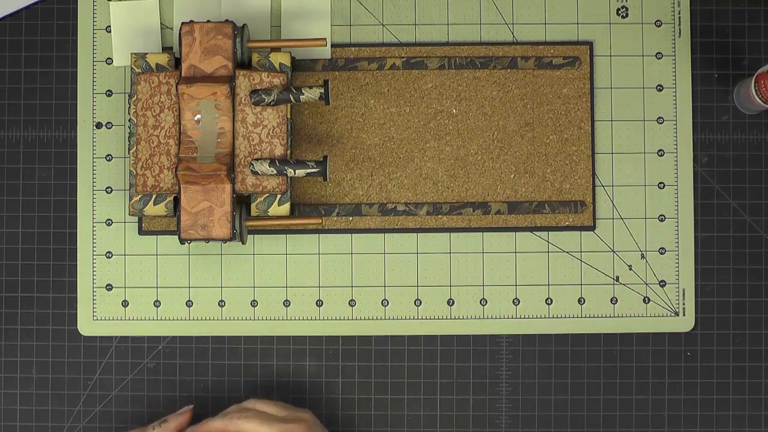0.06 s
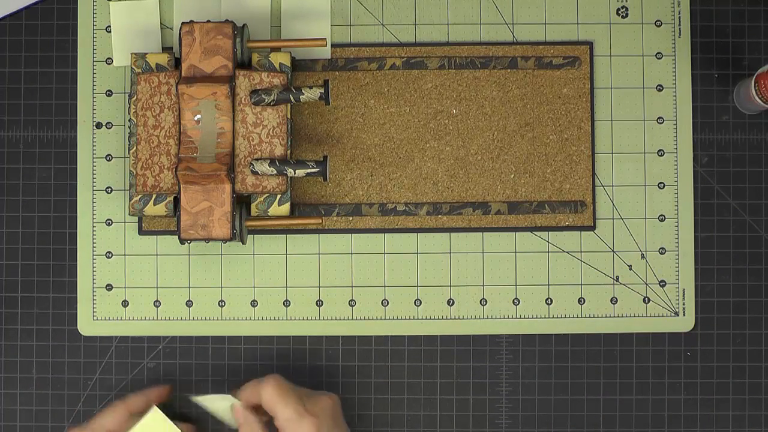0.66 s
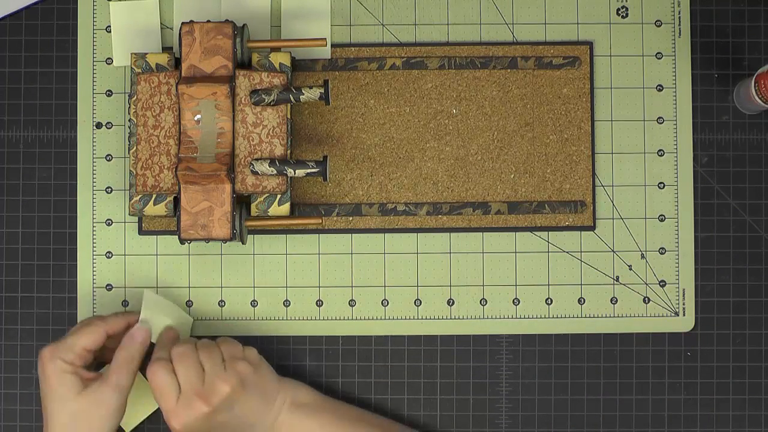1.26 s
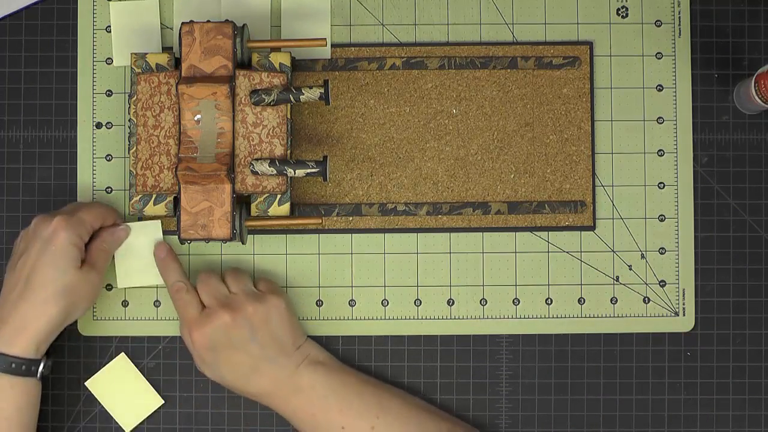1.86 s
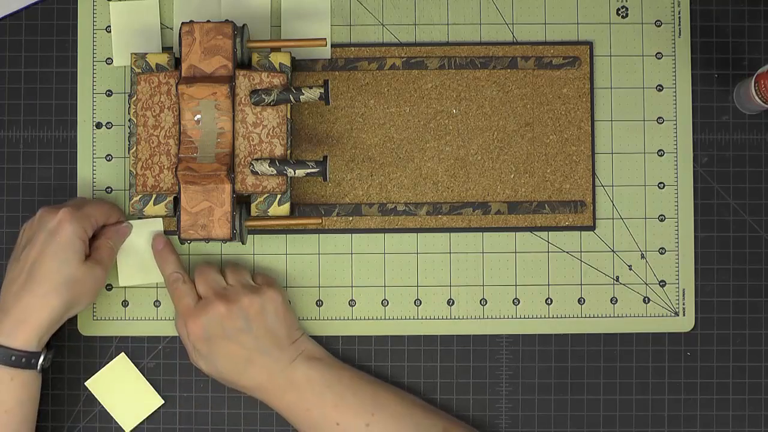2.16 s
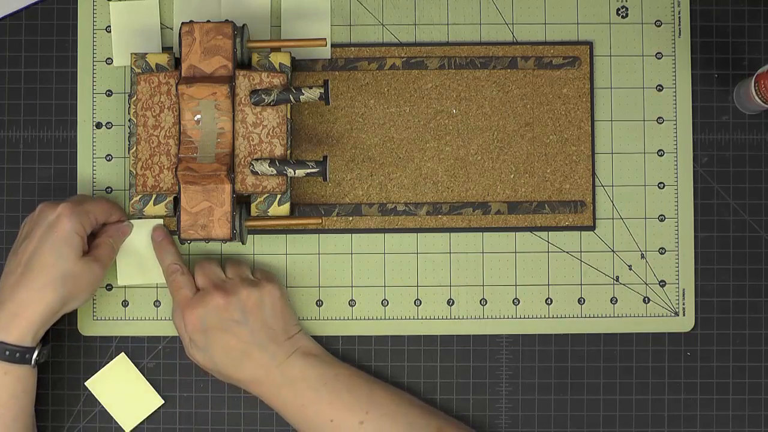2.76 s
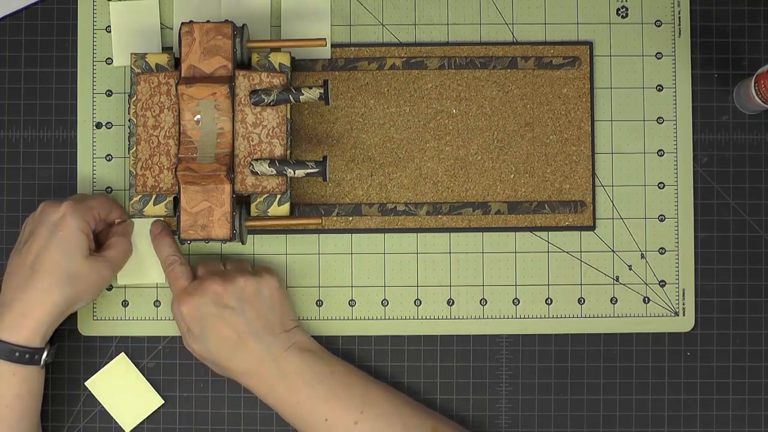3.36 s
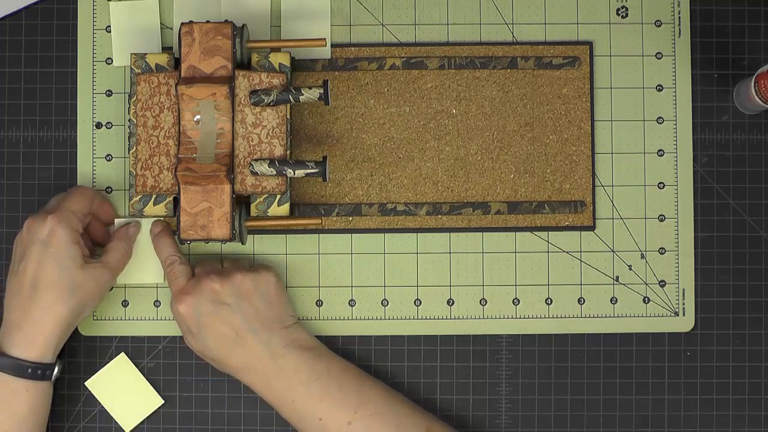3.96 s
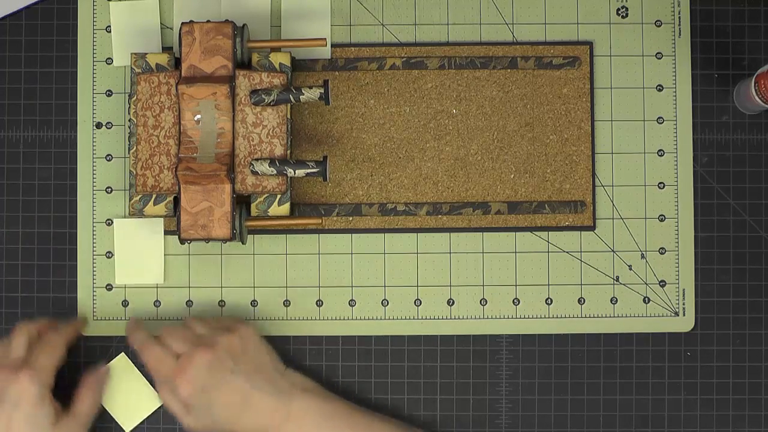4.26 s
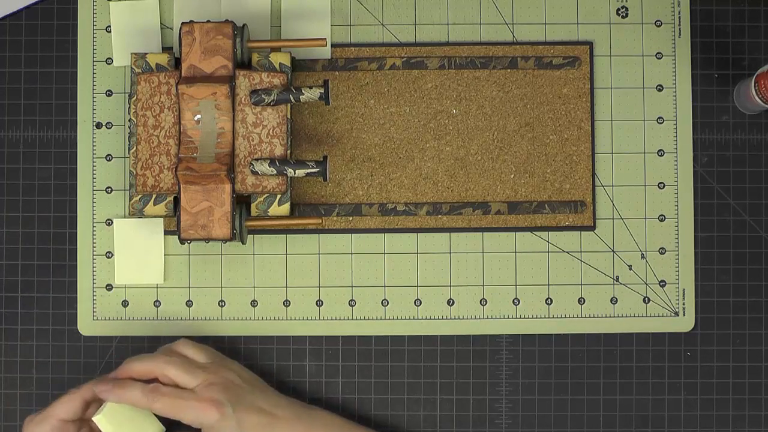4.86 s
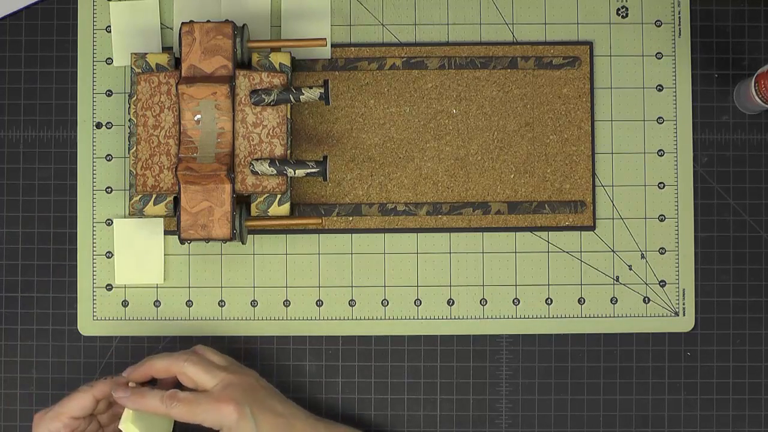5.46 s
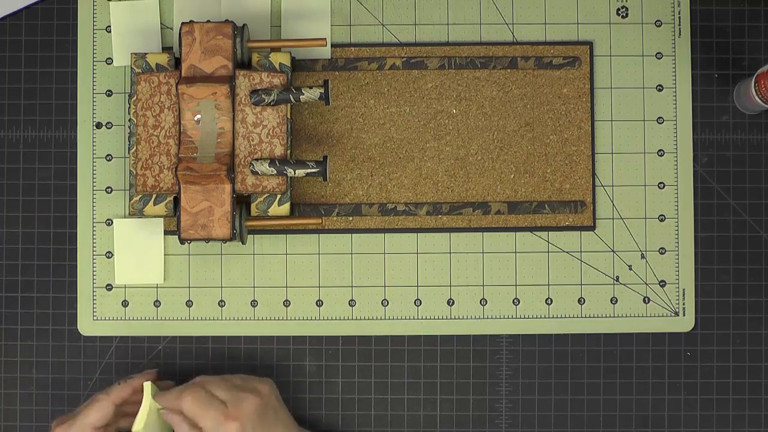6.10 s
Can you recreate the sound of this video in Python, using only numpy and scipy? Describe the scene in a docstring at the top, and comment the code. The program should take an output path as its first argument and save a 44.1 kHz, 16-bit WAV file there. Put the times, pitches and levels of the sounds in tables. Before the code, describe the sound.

Close paper rustles, flicks and snaps as sticky notes are peeled and pressed down, with soft desk knocks over a steady ventilation rumble.

```python
"""Sticky notes, peeled off a pad, flexed, slid under the edge of a model and pressed on a cutting mat.
Corners flick free and the bent sheet buckles with a snap; friction makes the paper hiss and ring.
Pad and fingers knock and drag on the desk. A nearly mono microphone above the desk picks up
the paper, the short echoes of a small room and a steady ventilation rumble."""
import sys
import numpy as np
from scipy import signal
from scipy.fft import rfft, irfft, next_fast_len
from scipy.io import wavfile
from scipy.ndimage import map_coordinates

SR = 44100
rng = np.random.default_rng(int(sys.argv[2]) if len(sys.argv) > 2 else 0)


def wrap_up_sound(samples):
    """Save the sound to the file named by the first command line argument, as 16-bit audio."""
    columns = np.atleast_2d(samples).T
    # keep every value between -1 and 1, then stretch to whole-number steps
    tamed = np.clip(columns, -1, 1)
    steps = np.round(tamed * 32767).astype(np.int16)
    wavfile.write(sys.argv[1], SR, steps)


N = 270333
LEAD_S = 0.025  # run-up to the peak of a slip


def amp(db):
    """Decibels to gain."""
    return 10 ** (np.asarray(db) / 20)


def unit(x):
    """x at rms 1."""
    return x / np.sqrt(np.mean(x ** 2) + 1e-20)


def burst(x, db):
    """Scale a short sound to the energy of 4 ms at the given level."""
    return amp(db) * x / np.sqrt(np.sum(x ** 2) / (0.004 * SR))


def along(points, hz):
    """Read (f/Hz, value) points on a log frequency axis."""
    f, values = np.transpose(points)
    return np.interp(np.log(hz + 1), np.log(f + 1), values)


def filtered(x, response):
    """Filter x by a complex response of frequency."""
    n = x.shape[-1]
    padded = next_fast_len(n + 4096)
    return irfft(rfft(x, padded) * response(np.fft.rfftfreq(padded, 1 / SR)), padded)[..., :n]


def band(hz, low_hz, top_hz):
    """A causal band-pass, 12 dB an octave on each side."""
    low, top = 1j * hz / low_hz, 1j * hz / top_hz
    return low ** 2 / (1 + np.sqrt(2) * low + low ** 2) / (1 + np.sqrt(2) * top + top ** 2)


def peak(hz, centre_hz, width_hz):
    """A resonance applied twice, for steep sides."""
    return (1j * hz * width_hz / (centre_hz ** 2 - hz ** 2 + 1j * hz * width_hz)) ** 2


def add(track, s, x):
    """Mix x into the track from time s."""
    skip, start = max(0, -round(s * SR)), max(0, round(s * SR))
    x = x[..., skip:skip + max(0, N - start)]
    track[..., start:start + x.shape[-1]] += x


def wobble(n, rate):
    """A smooth random curve, rate knots a second."""
    knots = rng.standard_normal(int(n * rate / SR) + 4)
    return map_coordinates(knots, [np.arange(n) * rate / SR])


def swell(n, edge):
    """A stroke speeds up and slows; edge is the length of each ramp as a share of the stroke."""
    u = np.linspace(0, 1, n)
    ramp = np.clip(np.minimum(u, 1 - u) / edge, 0, 1)
    return np.sin(np.pi / 2 * ramp) ** 0.59


# Width of the room sound at the microphone: f/Hz, side level/dB
SIDE_LEVELS = [(60, -19.5), (130, -13.5), (300, -7), (1000, -11.5), (4000, -34.5), (12000, -35.5)]
def diffuse(pair):
    """Two unrelated signals become the mid and side of a narrow stereo field."""
    side = filtered(pair[1], lambda hz: amp(along(SIDE_LEVELS, hz)))
    return np.array([pair[0] + side, pair[0] - side])


# Reverberation of the small room: f/Hz, time to fall 60 dB/s
ROOM_DECAY = [(150, 0.44), (1000, 0.31), (4000, 0.25), (8000, 0.2), (15000, 0.062)]
# Early echoes from surfaces near the desk: delay/s, gain
EARLY_ECHOES = [(.0027, 0.31), (.0048, 0.095), (.0085, 0.086), (0.0116, 0.23)]
def in_room(x, wet_db, build_s=0.00083, pan=0.11):
    """Desk to microphone: direct sound, early echoes and a tail that differs from spot to spot."""
    hz, t, spectra = signal.stft(rng.standard_normal((2, SR // 3)), SR, nperseg=256)
    decay = amp(-60 * t / along(ROOM_DECAY, hz)[:, None])
    tail = signal.istft(spectra * decay, SR, nperseg=256)[1]
    onset = 1 - np.exp(-np.arange(tail.shape[1]) / SR / build_s)
    tail = diffuse(tail * onset)
    response = amp(wet_db) * tail / np.linalg.norm(tail[0])
    response[:, 0] += 1  # direct sound
    for delay, gain in EARLY_ECHOES:
        arrival = round(delay * rng.uniform(0.85, 1.15) * SR)
        response[:, arrival] += gain * (1 + pan * rng.permutation([-1, 1]))
    return signal.fftconvolve(x[None], response, axes=1)


# Room tone at the microphone: f/Hz, relative spectral level/dB
ROOM_TONE = [(20, -26), (32, -13), (42, -5.5), (54, 4), (85, -3), (170, -5.5), (320, -9), (760, -14),
             (1400, -25), (2100, -27), (3900, -25.5), (7000, -31), (12400, -25.5), (16000, -29.5)]
# Fan and mains hum: f/Hz, level/dB
HUM_TONES = [(74, -60), (120, -65.5)]
def ventilation(air_db=-51.5, duct_db=-62, duct_top_hz=1700):
    """Steady rumble and hiss, a rush of air with a steep upper edge, and a hum that wavers."""
    def room_noise(response):
        return unit(diffuse(filtered(rng.standard_normal((2, N)), response)))
    air = room_noise(lambda hz: amp(along(ROOM_TONE, hz)))
    duct = room_noise(lambda hz: band(hz, 680, 3300) / (1 + (hz / duct_top_hz) ** 16))
    hum, t = np.zeros(N), np.arange(N) / SR
    for hz, db in HUM_TONES:
        waver = amp(2.5 * wobble(N, rate=4.6))
        phase = 2 * np.pi * hz * t + 1.1 * wobble(N, rate=6.2)
        hum += amp(db) * unit(waver * np.sin(phase))
    return amp(air_db) * air + amp(duct_db) * duct + hum


# Pad and fingers land on the desk and settle: t/s, level/dB, loss per contact/dB, f/Hz
DESK_KNOCKS = [(0.613, -42, 24, 248), (0.9972, -28.5, 3, 660), (1.109, -38.5, 21, 1320),
               (4.027, -46, 4, 326), (4.3671, -36.5, 1.5, 326), (5.8393, -44.5, 12, 920)]
def knocks(contacts=4, fall_s=0.0095, first_gap_s=0.008, gap_growth=1.3, dulling=0.91, spread=1.84):
    """Soft contacts thud in the covered desk, each later, weaker and duller than the last."""
    out, t = np.zeros((2, N)), np.arange(SR // 12) / SR
    for s, db, loss_db, pitch_hz in DESK_KNOCKS:
        for k in range(contacts):
            centre_hz = pitch_hz * dulling ** k
            low_hz, top_hz = centre_hz / spread, centre_hz * spread
            contact = np.exp(-t / fall_s) * rng.standard_normal(len(t))
            soft = signal.sosfilt(signal.butter(2, top_hz, fs=SR, output="sos"), contact)
            thud = filtered(soft, lambda hz: band(hz, low_hz, top_hz))
            delay = first_gap_s * sum(gap_growth ** np.arange(k))
            add(out, s + delay, in_room(burst(thud, db - loss_db * k), wet_db=-7))
    return out


def fibres(n, rate, spread_db=3.5):
    """Countless tiny slips of fibres, bunched into grains."""
    return unit(rng.standard_normal(n) * amp(spread_db * wobble(n, rate)))


def friction(n):
    """Grainy sliding force under a finger whose pressure wavers."""
    return fibres(n, rate=390) * amp(0.57 * wobble(n, rate=34))


def slip(rise_s, fall_s):
    """Tension builds in a rush of tiny slips, then lets go at LEAD_S."""
    t = np.arange(SR // 12) / SR - LEAD_S
    return np.exp(np.minimum(t / rise_s, -t / fall_s)) * rng.standard_normal(len(t))


# Tone colour of the paper from overhead: f/Hz, level/dB
PAPER_COLOUR = [(100, 15), (400, 1.5), (1250, 3.5), (1900, 1), (2600, 2), (3700, 7.5), (4800, 5),
                (6300, 4.5), (8200, 0.5), (12000, 4), (16000, 0.5)]
# Bending modes of a loose note: multiple of its ring pitch, weight
BENDING_MODES = [(0.961, 0.62), (1.048, 0.073), (1.54, 0.04)]
def sheet(x, ring_hz, ring_db, low_hz, top_hz, q=11, body_db=-18, smear_s=0.000664):
    """A loose note: a broad band, modes set by its free length, and a little body from the desk."""
    def mode(r):  # radiates its acceleration, which leaves a valley just below it
        return -r ** 2 / q / (1 - r ** 2 + 1j * r / q)

    def response(hz):
        ring = sum(weight * mode(hz / (ratio * ring_hz)) for ratio, weight in BENDING_MODES)
        paper = band(hz, low_hz, top_hz) * (1 + (amp(ring_db) - 1) * ring)
        body = amp(body_db) * band(hz, 80, 1700)
        # bending waves carry the highs across the sheet faster than the lows
        dispersion = np.exp(-2j * np.pi * smear_s * (2 * np.sqrt(hz * ring_hz) - hz))
        return amp(along(PAPER_COLOUR, hz)) * dispersion * (paper - body)
    return filtered(x, response)


# The hand drags paper over the desk: start t/s, end t/s, level/dB
DESK_DRAGS = [(0.411, 0.495, -50), (4.401, 4.433, -45.5), (4.513, 4.579, -39), (5.926, 6.06, -53.5)]
def drags(hiss_db=-4):
    """Friction on the desk top sounds lower than the paper, which hisses along with it."""
    out = np.zeros((2, N))
    for start, end, db in DESK_DRAGS:
        n = round((end - start) * SR)
        rub = unit(filtered(fibres(n, rate=700), lambda hz: band(hz, 360, 1170)))
        paper = sheet(friction(n), ring_hz=4020, ring_db=3, low_hz=1570, top_hz=6200)
        hiss = amp(hiss_db) * unit(paper * np.linspace(1, 0.35, n))
        add(out, start, in_room(amp(db) * swell(n, edge=1) * (rub + hiss), wet_db=-9.5))
    return out


# The sheet's edge chatters over the desk: t/s, length/s, level/dB, slip rate/Hz, top f/Hz
EDGE_SCRAPES = [(0.42, 0.077, -45, 2340, 3120), (1.319, 0.079, -41.5, 1860, 6500)]
def scrapes(regularity=0.62):
    """The edge sticks and slips almost regularly, so hiss gathers at multiples of the slip rate."""
    out = np.zeros((2, N))
    for start, length, db, slip_hz, top_hz in EDGE_SCRAPES:
        def comb(hz):
            return band(hz, 1340, top_hz) / (1 - regularity * np.exp(-2j * np.pi * hz / slip_hz))
        n = round(length * SR)
        chatter = unit(filtered(friction(n), comb))
        add(out, start, in_room(amp(db) * swell(n, edge=0.71) * chatter, wet_db=-15))
    return out


# Modes of a note pinned to the mat by a finger: f/Hz, width/Hz, level/dB
PINNED_MODES = [(3866, 1190, 4.5), (5390, 2300, -3), (7270, 1600, -21)]
def pinned(x, top_hz, hiss_db=-11):
    """The pinned note: a few damped modes over a broad hiss."""
    def response(hz):
        modes = sum(amp(db) * peak(hz, f, width) for f, width, db in PINNED_MODES)
        return modes + amp(hiss_db) * band(hz, 610, top_hz)
    return filtered(x, response)


# A finger pushes the note along the mat: t/s, length/s, level/dB
FINGER_PUSHES = [(2.008, 0.036, -52), (2.601, 0.059, -64), (2.874, 0.064, -61.5), (3.153, 0.033, -53),
                 (3.269, 0.13, -59.5), (3.423, .125, -44), (3.634, 0.037, -41), (3.803, 0.073, -47.5),
                 (3.952, .07, -53.5), (4.004, 0.062, -43)]
def rubs():
    """The friction of each push swells and fades, ringing the pinned note."""
    out = np.zeros((2, N))
    for start, length, db in FINGER_PUSHES:
        n = round(length * SR)
        rub = unit(pinned(friction(n), top_hz=11200))
        add(out, start, in_room(amp(db) * swell(n, edge=0.59) * rub, wet_db=-6))
    return out


# Clicks of the note on the mat: t/s, level/dB, fall/s
EDGE_CATCHES = [(1.7508, -43, 0.001), (3.1732, -49, 0.0047), (3.361, -55, .0015), (3.643, -26, 0.0014),
                (3.6772, -26, 0.003), (4.027, -33, 0.0013), (4.037, -34, 0.0084), (4.1307, -41, 0.0057)]
def catches(rise_s=0.0024):
    """The pinned note's edge catches and slips free, always at the same pitch."""
    out = np.zeros((2, N))
    for s, db, fall_s in EDGE_CATCHES:
        click = pinned(slip(rise_s, fall_s), top_hz=11600)
        add(out, s - LEAD_S, in_room(burst(click, db), wet_db=-9.5))
    return out


def crinkles(start_s=5.15, end_s=9.6, first_db=-53, last_db=-45, count=12):
    """Fingertips work the next note loose in tiny random ticks; only those before sample N sound."""
    out = np.zeros((2, N))
    for progress, weakness in rng.random((count, 2)):
        s = start_s + (end_s - start_s) * progress
        db = first_db + (last_db - first_db) * progress - 6 * weakness
        tick = sheet(slip(0.0006, 0.00066), ring_hz=4050, ring_db=26, low_hz=1800, top_hz=9000)
        add(out, s - LEAD_S, in_room(burst(tick, db), wet_db=-8))
    return out


def slide(curve, ring_hz, ring_db, low_hz, dull_hz, bright_hz, turn_db=-49.5, range_db=9):
    """Friction drives the loose sheet: the faster it moves, the louder and brighter."""
    times, levels = np.transpose(curve)
    n = round((times[-1] - times[0]) * SR)
    level_db = np.interp(times[0] + np.arange(n) / SR, times, levels)
    brightness = (1 + np.tanh((level_db - turn_db) / range_db)) / 2
    dull = unit(sheet(friction(n), ring_hz, ring_db, low_hz, dull_hz, q=10))
    bright = unit(sheet(friction(n), ring_hz, ring_db, low_hz, bright_hz, q=10))
    hiss = np.sqrt(1 - brightness) * dull + np.sqrt(brightness) * bright
    out = np.zeros((2, N))
    add(out, times[0], in_room(amp(level_db) * hiss, wet_db=-5.5))
    return out


# Hiss of the first note leaving the pad: t/s, level/dB
DRAW_LEVELS = [(0.07, -62), (0.14, -46.5), (0.21, -55.5), (0.27, -57), (0.31, -69), (0.345, -52),
               (0.47, -50), (0.59, -52.5), (0.70, -66), (0.825, -57), (0.865, -44.5), (0.9, -47),
               (0.935, -67)]
def drawing():
    """The note slides between the fingers."""
    return slide(DRAW_LEVELS, ring_hz=3930, ring_db=9, low_hz=1480, dull_hz=9600, bright_hz=13700)


# Rustle on the way to the mat: t/s, level/dB
CARRY_LEVELS = [(0.93, -58), (0.98, -49), (1.01, -50.5), (1.14, -55.5), (1.29, -53.5), (1.37, -51),
                (1.45, -53), (1.51, -53), (1.57, -70)]
def carrying():
    """The bent note rubs on the fingers that carry it."""
    return slide(CARRY_LEVELS, ring_hz=4200, ring_db=6, low_hz=1940, dull_hz=8600, bright_hz=10000)


# Rasp of the next note being lifted: t/s, level/dB
PEEL_LEVELS = [(5.70, -50.5), (5.79, -56), (5.825, -63), (5.885, -49.5), (5.926, -63), (5.94, -36.5),
               (6.01, -39), (6.04, -49), (6.075, -50.5), (6.13, -38)]
def peeling():
    """The glue strip tears off the pad."""
    return slide(PEEL_LEVELS, ring_hz=4360, ring_db=9.5, low_hz=1350, dull_hz=10400, bright_hz=13300)


# Free corners flick: t/s, level/dB, fall/s, ring f/Hz, ring level/dB, low f/Hz, top f/Hz
CORNER_FLICKS = [ (0.063, -27.5, .008, 3600, 4, 494, 8250), (0.9978, -33.5, .0028, 3470, 8, 700, 5600),
                 (1.1090, -27.5, 0.001, 4400, 18.5, 900, 5400),
                 (1.2520, -33.5, 0.0025, 4200, 10.5, 397, 4300),
                 (1.585, -29, 0.0036, 2870, 12.5, 1380, 2040), (4.2597, -27, 0.0023, 3500, -7, 2900, 7100),
                 (4.9950, -35.5, 0.014, 3860, 12, 1800, 9500), (5.4647, -46, 0.0065, 3900, 2, 1500, 10900),
                 (5.6480, -36.5, .0046, 4150, 1, 1800, 9300), (5.7038, -31.5, 0.0039, 2650, 9, 1790, 9500),
                 (5.7850, -42.5, 0.0012, 4000, -1, 1490, 10000),
                 (5.8380, -33, 0.007, 11800, 13, 600, 15200),
                 (6.007, -34.5, 0.00088, 4650, 19, 2000, 12440)]
def flicks(rise_s=0.0006):
    """A corner lets go at once; its free length sets the ring."""
    out = np.zeros((2, N))
    for s, db, fall_s, ring_hz, ring_db, low_hz, top_hz in CORNER_FLICKS:
        flick = sheet(slip(rise_s, fall_s), ring_hz, ring_db, low_hz, top_hz, q=8.9)
        add(out, s - LEAD_S, in_room(burst(flick, db), wet_db=-7))
    return out


# The bent sheet snaps through below the microphone:
# t/s, crack level/dB, crack rise and fall/s, rush level/dB, flap level/dB, ring f/Hz, top f/Hz
SHEET_BUCKLES = [(0.616, -14, 0.00037, -20, -46, 5880, 10600), (1.4002, -19, .003, -26, -21, 7130, 8750)]
def buckles(flap_delay_s=0.012):
    """Slips gather into a rush with a crack at its peak; then the sheet swings over in a lower flap."""
    out = np.zeros((2, N))
    for s, crack_db, crack_s, rush_db, flap_db, ring_hz, top_hz in SHEET_BUCKLES:
        rush = sheet(slip(0.008, 0.011), ring_hz, ring_db=-1, low_hz=1610, top_hz=top_hz)
        crack = sheet(slip(crack_s, crack_s), ring_hz, ring_db=12.5, low_hz=2290, top_hz=top_hz, q=7)
        flap = sheet(slip(0.0071, 0.0024), ring_hz=1826, ring_db=10, low_hz=1020, top_hz=3230)
        snap = burst(rush, rush_db) + burst(crack, crack_db)
        add(out, s - LEAD_S, in_room(snap, wet_db=-8.5))
        add(out, s + flap_delay_s - LEAD_S, in_room(burst(flap, flap_db), wet_db=-9))
    return out


def scene():
    """Paper and desk sounds over the room tone, heard from overhead."""
    sliding = drawing() + carrying() + peeling()
    handling = flicks() + buckles() + catches() + rubs() + scrapes() + crinkles()
    return sliding + handling + knocks() + drags() + ventilation()


def record(dry):
    """The two microphone ports differ slightly in the treble; the recorder cuts off at its band limit."""
    port_hz, port_width_hz, port_db, limit_hz = 8300, 620, -6, 16000
    side = filtered(dry.mean(axis=0), lambda hz: 1j * amp(port_db) * peak(hz, port_hz, port_width_hz))
    ports = dry + np.array([side, -side])
    return filtered(ports, lambda hz: 1 / (1 + (hz / limit_hz) ** 160))


dry = scene()
out = record(dry)
wrap_up_sound(out)
```